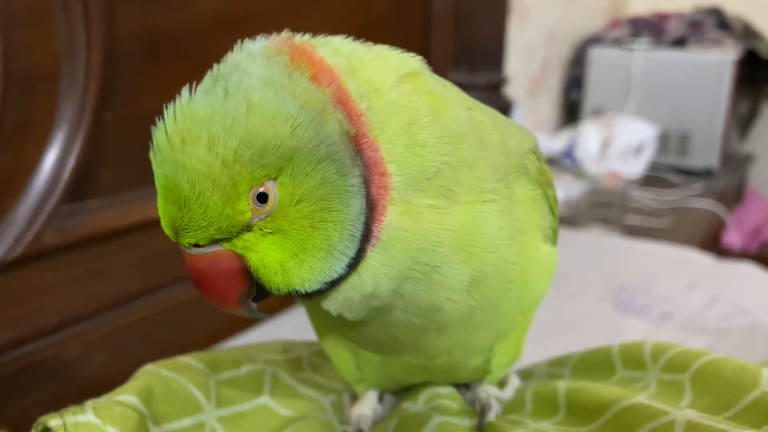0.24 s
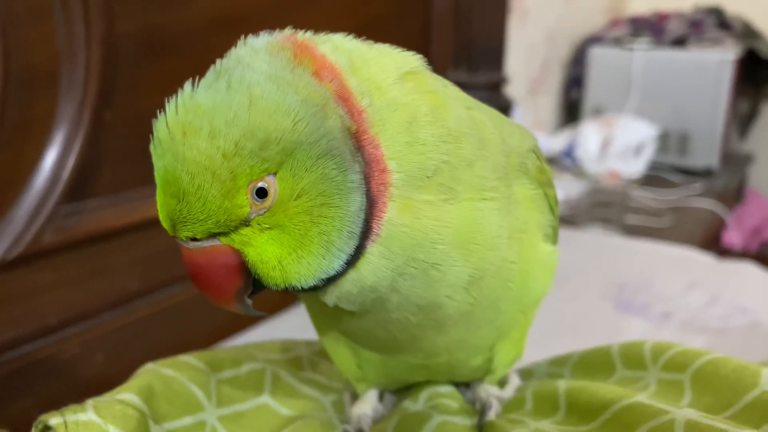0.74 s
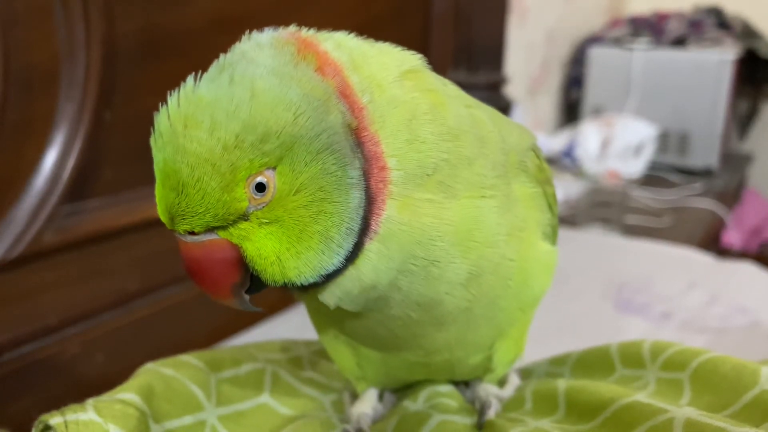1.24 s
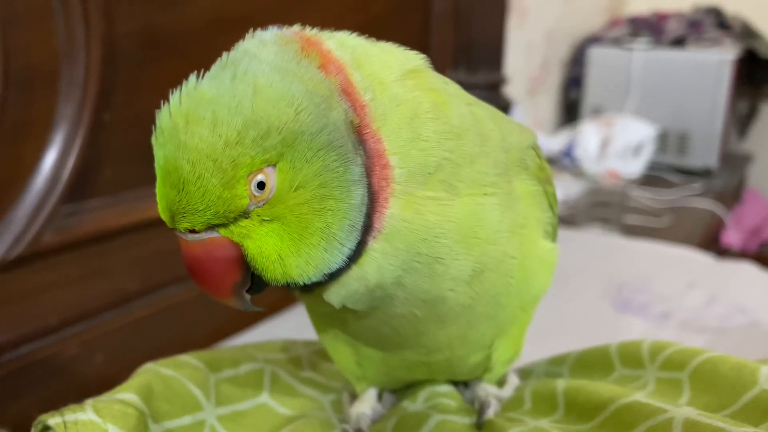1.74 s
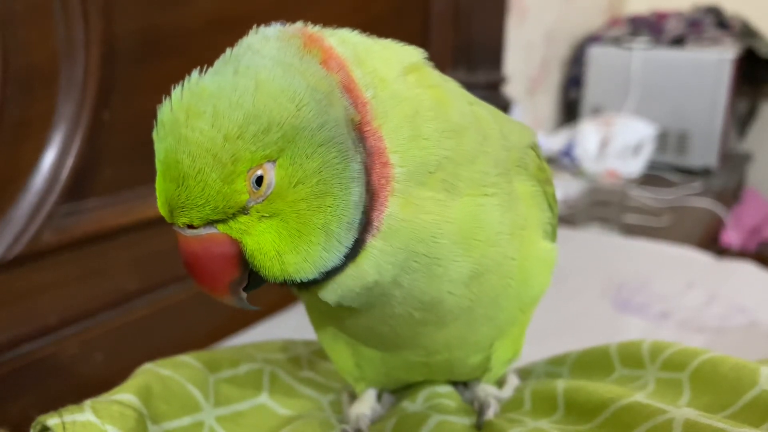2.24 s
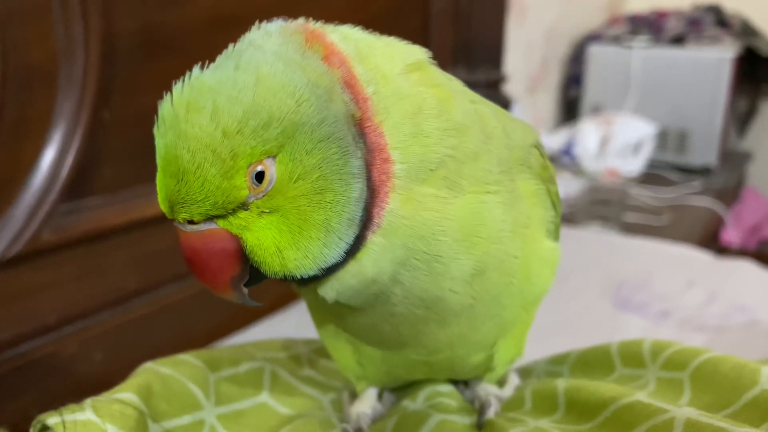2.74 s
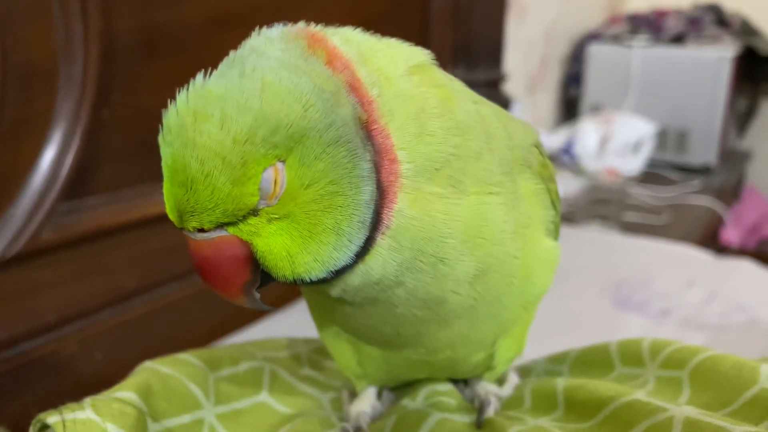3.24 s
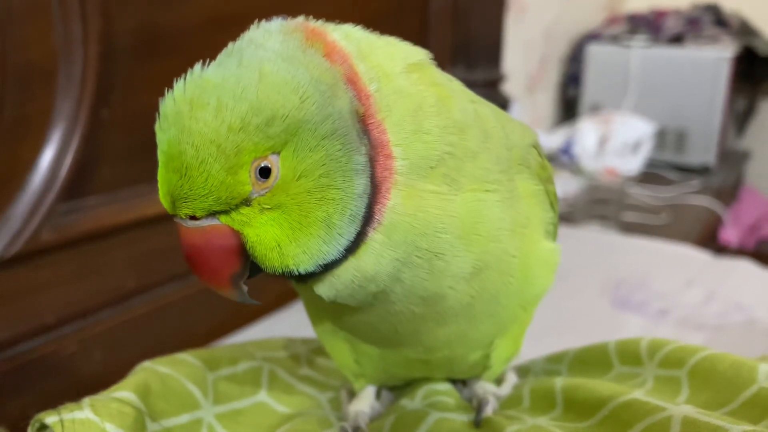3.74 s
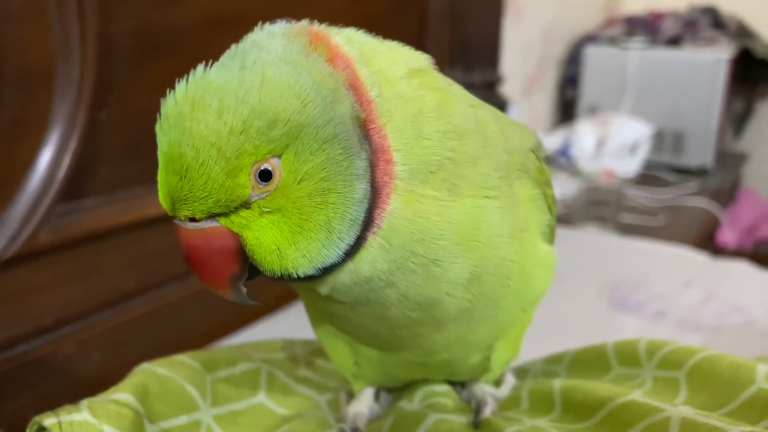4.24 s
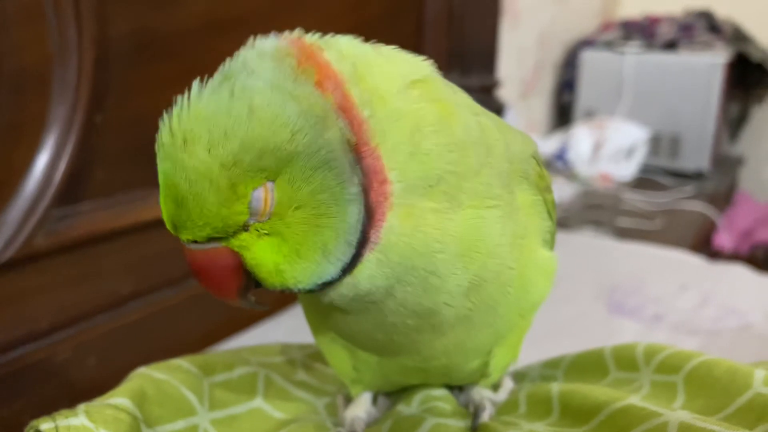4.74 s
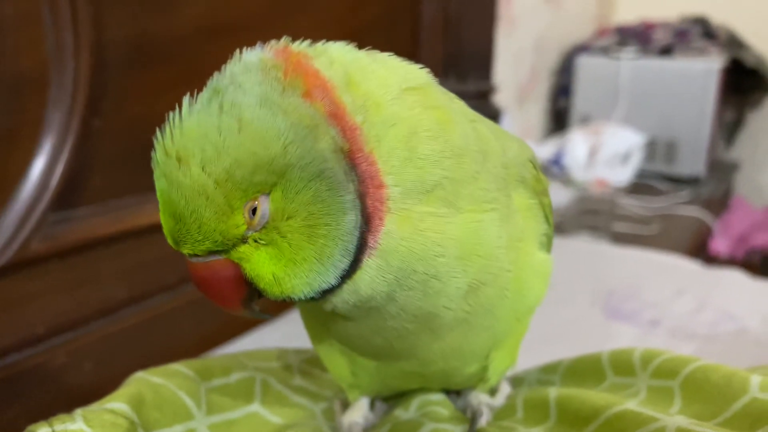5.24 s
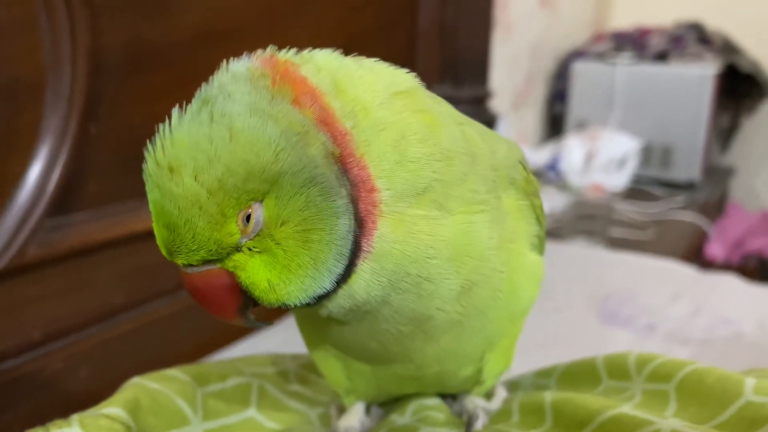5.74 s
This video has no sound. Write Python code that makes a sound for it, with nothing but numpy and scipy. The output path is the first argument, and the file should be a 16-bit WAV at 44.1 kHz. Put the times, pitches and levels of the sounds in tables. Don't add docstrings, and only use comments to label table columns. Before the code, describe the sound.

A parrot close by gives thirteen short, evenly spaced clucks, then one loud, harsh, rattling trill, over soft fan hiss and low air buffeting.

```python
import sys
import numpy as np
from scipy import signal
from scipy.fft import rfft, irfft, next_fast_len
from scipy.io import wavfile
from scipy.ndimage import uniform_filter1d

SR = 44100
rng = np.random.default_rng(int(sys.argv[2]) if len(sys.argv) > 2 else 0)


def volts_from_db(level):
    exponent = np.asarray(level, float) / 20
    return 10 ** exponent


def generate_wav(signal):
    frames = np.transpose(np.atleast_2d(signal))
    scaled = np.clip(frames, -1, 1) * 32767
    pcm = np.round(scaled).astype(np.int16)
    wavfile.write(sys.argv[1], SR, pcm)


N = 263762


def evened(x):
    return x / np.sqrt(np.mean(x ** 2) + 1e-20)


def read(points, hz):
    f, value = np.transpose(points)
    return np.interp(np.log(hz + 1), np.log(f + 1), value)


def along(points, t):
    return np.interp(t, *np.transpose(points))


def add(mix, s, sound):
    part = mix[round(s * SR):][:len(sound)]
    part += sound[:len(part)]


def drift(count, width):
    return uniform_filter1d(rng.standard_normal(count), size=width)


def coloured(x, points):
    log_gain = np.log(volts_from_db(read(points, abs(np.fft.fftfreq(4096, 1 / SR)))))
    taps = np.fft.ifft(np.exp(np.conj(signal.hilbert(log_gain)))).real[:2048]
    return signal.oaconvolve(x, taps)[:len(x)]


def air(points, same, size, patchy_db, flicker_db):
    hop, hz = size // 4, np.fft.rfftfreq(size, 1 / SR)
    a, b, c, d, patches = rng.standard_normal((N // hop + 5, len(hz), 5)).T
    patches = uniform_filter1d(patches, size=6, axis=0)
    patches = evened(uniform_filter1d(patches, size=8, axis=1))
    flicker = evened(drift(a.shape[1], 3))
    same = np.clip(same(hz), -1, 1)[:, None]
    left = a + 1j * b
    right = same * left + np.sqrt(1 - same ** 2) * (c + 1j * d)
    level_db = read(points, hz)[:, None] + patchy_db * patches + flicker_db * flicker
    z = np.array([left, right]) * volts_from_db(level_db)
    return evened(signal.istft(z, nperseg=size, noverlap=size - hop)[1][:, :N])


# freq_hz, density_db
HISS_SPECTRUM = [(90, -25), (150, -3), (310, -10), (675, 3), (920, -6.5), (1150, -5.5), (2500, -16),
                 (4500, -24.5), (7200, -29.5), (9000, -34.5), (11300, -34.5), (13200, -39.5), (14800, -39),
                 (15800, -70)]
# freq_hz, left_right_likeness (-1 to 1)
HISS_COHERENCE = [(60, 0.13), (180, -0.94), (550, 0.082), (1650, 0.16), (4970, 0.26), (15000, -0.77)]


def fan_hiss():
    return volts_from_db(-40) * air(HISS_SPECTRUM, lambda hz: read(HISS_COHERENCE, hz),
                          size=1024, patchy_db=2.0, flicker_db=0.18)


# time_s, level_db
DRAUGHT = [(0.0, -40.5), (0.6, -41.5), (1.1, -40.5), (1.58, -40), (1.65, -59), (1.9, -46.5), (1.97, -41.5),
           (2.55, -46), (3.05, -42), (3.7, -41.5), (4.2, -39), (4.6, -40.5), (5.2, -39.5), (5.5, -43.5),
           (5.6, -39.5), (5.9, -45.5)]
# peak_s, peak_db
GUSTS = [(0.48, -39), (0.66, -42), (0.87, -42), (0.96, -33.5), (1.22, -38), (1.3, -43), (1.46, -41),
         (1.6, -36), (1.7, -41), (1.85, -36.5), (2.66, -40), (2.88, -32.5), (3.149, -39), (3.75, -34),
         (3.88, -31), (3.98, -30), (4.101, -30), (4.55, -37.5), (4.75, -57), (4.88, -50), (4.95, -32),
         (5.34, -44), (5.53, -35.5), (5.98, -33)]
# freq_hz, density_db
BUFFET_SPECTRUM = [(12, -45), (20, -30), (50, 3), (70, -1.5), (160, -3), (203, -5.5), (235, -6.5),
                   (464, -8.5), (600, -22.5), (780, -11.5), (1320, -120)]


def buffeting():
    t = np.arange(N) / SR
    gust_s = 0.034
    strength = volts_from_db(along(DRAUGHT, t))
    for s, db in GUSTS:
        strength += volts_from_db(db) * np.exp(-((t - s) / gust_s) ** 2) / 2
    return strength * air(BUFFET_SPECTRUM, lambda hz: np.full_like(hz, .58),
                          size=2048, patchy_db=3.0, flicker_db=1.5)


# start_s, peak_db, freq_hz, t60_s
THUDS = [(0.959, -18.5, 294, 0.03), (1.457, -12, 137, 0.023), (1.833, -23.5, 184, 0.049),
         (3.729, -23.5, 277, 0.051), (3.873, -21, 131.8, 0.057), (4.079, -29, 101.3, 0.045),
         (4.191, -21.5, 152, 0.062), (4.259, -19, 145.6, 0.041), (4.36, -19, 159, 0.033),
         (4.422, -19.5, 107, 0.046), (4.931, -25, 102, 0.06), (5.232, -16.5, 296, 0.022)]


def thuds():
    out = np.zeros(N)
    t = np.arange(6000) / SR
    for s, db, hz, t60 in THUDS:
        attack = np.clip(t / 0.0043, 0, 1)
        add(out, s, volts_from_db(db - 60 * t / t60) * attack * np.sin(2 * np.pi * hz * t))
    return out


# start_s, end_s, pitch_hz, level_db
FAR_TONE = (2.88, 3.12, 300, -49)


def far_tone():
    out = np.zeros(N)
    start, end, hz, db = FAR_TONE
    t = np.arange(0, end - start, 1 / SR)
    add(out, start, volts_from_db(db) * np.sin(2 * np.pi * hz * t) * signal.windows.tukey(len(t), .4))
    return out


# freq_hz, t60_s
REVERBERATION = [(500, .35), (2000, .33), (5000, .22), (12000, .07)]
# delay_s, level_db
ECHOES = [
    (.0034, -17),
    (.0062, -31.5),
    (0.0114, -23.5),
    (0.0166, -28),
]


def room(x):
    taps = np.zeros((2, SR // 2))
    at = np.arange(700, SR // 2 - 20, 20) + rng.integers(0, 20, (2, (SR // 2 - 701) // 20))
    np.put_along_axis(taps, at, rng.choice([-1., 1.], at.shape), 1)
    hz, t, z = signal.stft(taps, SR, nperseg=256)
    decay = volts_from_db(-60 * t / read(REVERBERATION, hz)[:, None])
    tail = signal.istft(z * decay, SR, nperseg=256)[1]
    tail *= volts_from_db(-24.5) / np.linalg.norm(tail[0])
    for s, db in ECHOES:
        tail[:, round(s * SR)] += volts_from_db(db)
    return signal.fftconvolve(x, tail, axes=1)[:, :N]


def ports(x, side, lead):
    size = next_fast_len(N)
    hz = np.fft.rfftfreq(size, 1 / SR)
    shade = volts_from_db(-read(side, hz)) * np.exp(-1j * along(lead, hz))
    return np.array([x, irfft(rfft(x, size) * shade, size)[:N]])


# start_s, length_s, effort_db, valve_snap (-0.3 loose to about 1 tight)
PUFFS = [(3.4391, 0.017, -20.5, .3), (3.466, 0.019, -20.5, -0.051), (3.494, 0.02, -18, 0.12),
         (3.523, 0.02, -16.5, 0.18), (3.552, 0.019, -17.5, -.3), (3.5797, 0.024, -16.5, -0.021),
         (3.609, 0.022, -17.5, -0.25), (3.639, 0.022, -17, -0.24), (3.6685, 0.021, -18, -0.28),
         (3.699, 0.023, -19, -0.15), (3.7296, 0.0197, -18.1, .25), (3.7622, 0.0185, -17.5, .7),
         (3.7931, 0.0198, -17.5, 0.81), (3.8242, 0.0188, -17.5, 0.81), (3.856, 0.018, -17.5, .95),
         (3.887, 0.01977, -17, 0.886), (3.9192, 0.0204, -18.5, .05), (3.9528, 0.017, -19.5, 0.33),
         (3.9842, 0.017, -20, 0.92), (4.018, 0.014, -20.5, 1.19), (4.0489, 0.016, -20.5, 1.19),
         (4.0854, 0.013, -21.5, 1.05), (4.1155, 0.012, -26, 1.3)]
# time_s, pitch_hz
TRILL_PITCH = [
    (3.447, 705),
    (3.475, 648.4),
    (3.51, 648.5),
    (3.6, 663),
    (3.71, 648.5),
    (3.86, 666.5),
    (3.96, 659.8),
    (4.092, 590.4),
    (4.122, 612),
]
# freq_hz, gain_db
TRILL_THROAT = [(650, -26), (1300, 0), (1950, -16.5), (2600, -18), (3250, -33.5), (4500, -81), (5850, -14),
                (6500, -4), (7150, 2.5), (8300, -22.5), (10300, -6), (11400, -21.5), (14300, -23),
                (15500, -80)]
# freq_hz, difference_db
TRILL_SIDE = [(350, 0), (650, 9), (1100, 5), (1550, -4), (2000, 1), (2550, 5.5), (3200, 0), (5000, 2),
              (5900, 9), (6500, 3), (8000, 0)]
# freq_hz, lead_rad
TRILL_LEAD = [(0, 0), (650, .5), (1300, 1), (1700, 2.5), (1950, 4.8), (2600, 5.6), (3300, 6.5), (5000, 6.3),
              (5600, 4), (6200, 6.3)]


def trill():
    start, length, effort_db, snap = np.transpose(PUFFS)
    end, centre = start + length, start + length / 2
    t = np.arange(start[0] - .01, start[-1] + .05, 1 / SR)
    effort = np.interp(t, centre, effort_db)

    middle = along(TRILL_PITCH, centre)
    gap = np.append((end[:-1] + start[1:]) / 2, end[-1] + 0.011)
    knots = [start + share * length for share in (.15, .5, .88)] + [end + .0028, gap]
    ratios = [1 + .1 * snap, 1, 1 - .015, 1.19 + .12 * snap, 1.24 + 0.055 * snap]
    pitches = [ratio * middle for ratio in ratios]
    hz = np.interp(t, np.transpose(knots).ravel(), np.transpose(pitches).ravel())
    hz = uniform_filter1d(hz, size=60) * (1 + .07 * drift(len(t), 60))
    phase = 2 * np.pi * np.cumsum(hz) / SR

    opening_ramp = (t - start[:, None]) / .005 * (1 + 2.1 * snap[:, None])
    closing_ramp = (end[:, None] - t) / .0052
    inside = np.max(np.minimum(opening_ramp, closing_ramp), axis=0)
    valve = np.sin(np.pi / 2 * np.clip(inside + 0.72, 0, 1)) ** 2

    fade = np.clip((t - t[0]) / 0.0074, 0, 1) * np.clip((t[-1] - t) / 0.022, 0, 1)
    lost_db = effort + 17.5
    leak_db = -8.5 - 10.5 * np.interp(t, start, snap) + 1.9 * lost_db
    leak = volts_from_db(np.minimum(leak_db, 0)) * fade
    bright = volts_from_db(-20.5 + 1.15 * lost_db) * np.minimum((t - t[0]) / 0.042, 1)
    thin = volts_from_db(-3 * np.interp(t, centre, snap))

    voice = np.maximum(valve, leak) * np.cos(phase)
    for k in range(2, 24):
        gain = volts_from_db(read(TRILL_THROAT, k * hz))
        if k > 7:
            gain = gain * bright
        elif k == 3:
            gain = gain * thin
        opening = np.maximum(valve ** (1 + 0.28 * k), 0.72 * leak ** (k / 2))
        voice += gain * opening * np.cos(k * (phase - 1.55) + 1.55)
    breath = np.diff(coloured(rng.standard_normal(len(t) + 1), TRILL_THROAT))
    breath = breath * volts_from_db(-19) * bright * valve
    shimmer = 1 + .7 * drift(len(t), 90)
    top_cut = signal.butter(8, 14900, fs=SR, output="sos")
    sound = signal.sosfilt(top_cut, shimmer * voice + breath)
    out = np.zeros(N)
    add(out, t[0], volts_from_db(2.5 + effort) * sound)
    return ports(out, TRILL_SIDE, TRILL_LEAD)


# strongest_pulse_s, voice_db, pitch_hz, third_harmonic_db, rasp_db
CLUCKS = [(0.1446, -11, 1058, -6.5, 5), (0.37, -11.5, 907, -1, 1.5), (0.5928, -11.5, 930, 0, 11),
          (0.8078, -10.5, 1012, -5, -5), (1.0244, -11.5, 976, -3, 12), (1.2487, -9.5, 1001, -2, 3),
          (1.462, -9.9, 1053, -6, -1), (1.6878, -9.5, 1031, -9, 3), (1.9148, -11.5, 1016, -11, 0.5),
          (2.1363, -10.5, 1017, -6.5, 5.5), (2.3494, -11, 1092, -16.5, 5.5), (2.557, -8, 1061, -8.5, 1.5),
          (2.7731, -11.5, 1124, -16, 9)]
# freq_hz, gain_db
CLUCK_THROAT = [(1500, -21.5), (2450, 0), (2900, -0.5), (3700, -16), (4500, -31.5), (5350, -9.5),
                (6500, -18), (7500, -29.5), (8800, -33.5), (10300, -39.5), (11800, -20.5), (13200, -41),
                (15000, -40), (16300, -70)]
# freq_hz, difference_db
CLUCK_SIDE = [(500, 0), (800, 11), (1200, 10), (1500, 0), (2050, 9), (2300, 4), (2600, 11), (3300, 0),
              (4600, -2), (5400, 14), (5900, 16), (6500, 4), (8000, 0)]
# freq_hz, lead_rad
CLUCK_LEAD = [(0, 0), (700, .6), (1300, 1), (1800, 3), (2300, 4.1), (3300, 6.2), (4500, 6.3), (5200, 4),
              (5900, 3.7), (6400, 6.3)]


def clucks():
    out = np.zeros(N)
    t = np.arange(-132, 500) / SR
    after = np.maximum(t, 0)
    for s, db, hz, third_db, rasp_db in CLUCKS:
        length_s = 0.00411 + .000004 * (hz - 900)
        second_db = 1 - 0.1 * max(998 - hz, 0)

        top_db = 1.5 + 0.55 * rasp_db - 18 * (s == CLUCKS[0][0])
        snap_db = -2.5 + rasp_db
        colour = [(2390, rasp_db), (4030, snap_db), (6700, 0), (12000, top_db), (16300, -4)]

        phase = 2 * np.pi * hz * (t - 11.2 * t ** 2)
        phase += .6 * drift(len(t), 50)
        swell = np.clip(1 + t / .0023, 0, 1) ** 1.1 * np.exp(-after / .016)
        shut = np.exp(-np.maximum(t - length_s + 0.00215, 0) / 0.0005)

        windpipe = np.maximum(shut, volts_from_db(-11) * np.exp(-after / .005))
        beak = np.maximum(shut, volts_from_db(-10.5) * np.exp(-after / 0.0099))
        low = shut * np.cos(phase - 1)
        low += volts_from_db(second_db) * windpipe * np.cos(2 * phase)
        low += volts_from_db(third_db) * beak * np.cos(3 * phase - .6)

        high = sum(np.cos(k * phase) for k in range(4, 17)) + 1.48 * rng.standard_normal(len(t))
        edge = swell ** 1.5 * shut * np.exp(-after / 0.0019) * high
        edge = coloured(coloured(edge, CLUCK_THROAT), colour)
        add(out, s + t[0], volts_from_db(db) * (volts_from_db(1.0) * swell * low + edge))
    return ports(out, CLUCK_SIDE, CLUCK_LEAD)


def scene():
    background = fan_hiss() + buffeting() + thuds() + far_tone()
    bird = trill() + clucks()
    return background + bird + room(bird)


# freq_hz, share_from_left (0 to 1)
MONO = [(6200, 0), (7200, 1)]
# freq_hz, turn_rad
TREBLE_TURN = [(5800, 0), (6400, .5), (9000, -3.14), (11000, -6.28), (13100, -9.42), (15500, -12.57)]


def phone(dry):
    size = next_fast_len(N)
    hz = np.fft.rfftfreq(size, 1 / SR)
    left, right = rfft(dry, size) / np.sqrt(1 + (48 / (hz + 1)) ** 7)
    mono = along(MONO, hz)
    right = mono * left + np.sqrt(1 - mono ** 2) * right
    right = right / np.sqrt(1 + 0.34 * np.sin(np.pi * mono))
    right = right * np.exp(-1j * along(TREBLE_TURN, hz))
    wide = irfft(np.array([left, right]), size)[:, :N]
    return 1.1 * np.tanh(wide / 1.1)


def band_limit(x):
    return signal.sosfilt(signal.butter(12, 16640, fs=SR, output="sos"), x)


def record(dry):
    mix = phone(dry)
    return band_limit(mix)


dry = scene()
out = record(dry)
generate_wav(out)
```